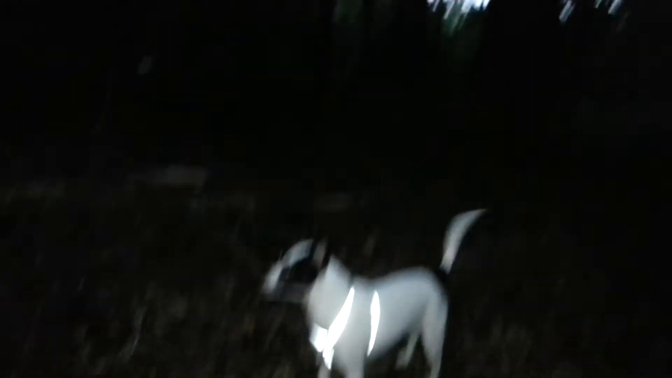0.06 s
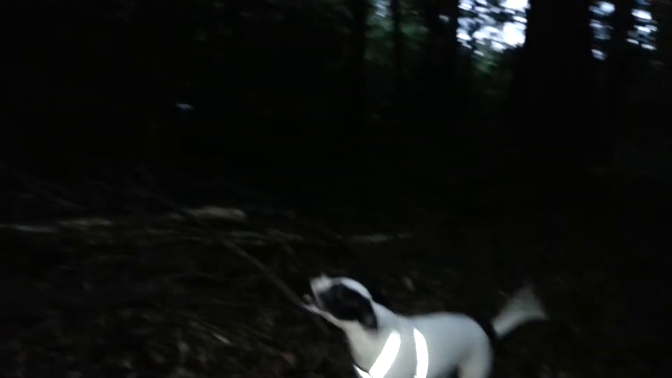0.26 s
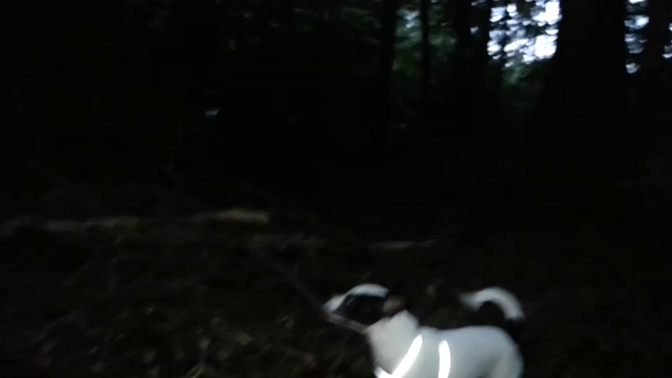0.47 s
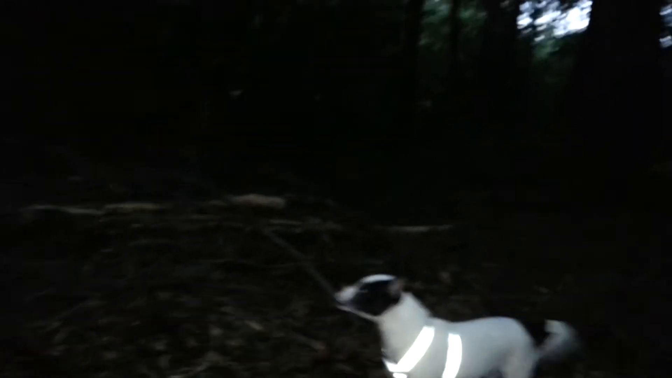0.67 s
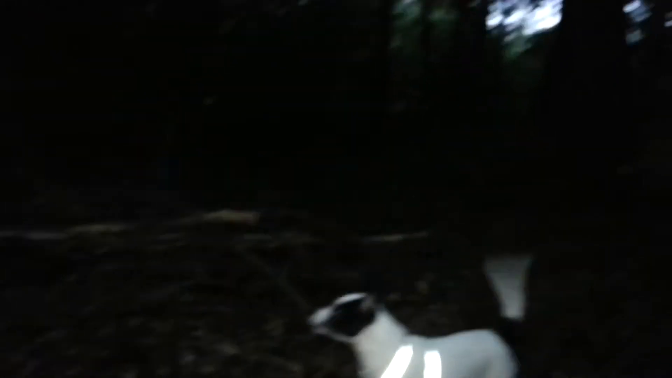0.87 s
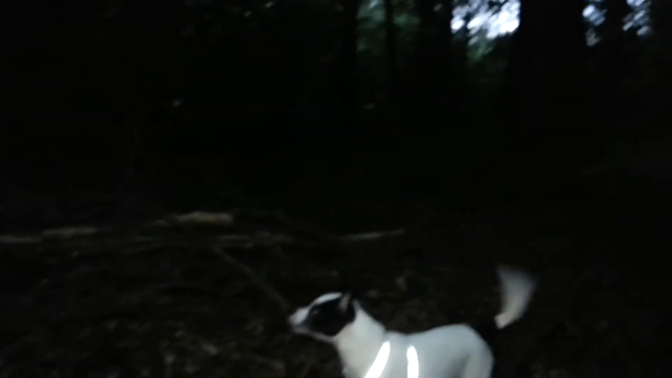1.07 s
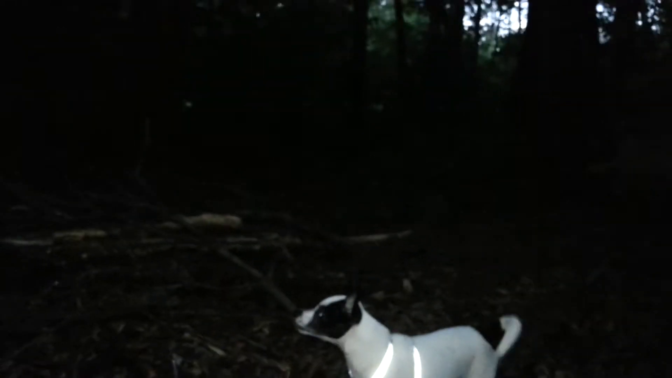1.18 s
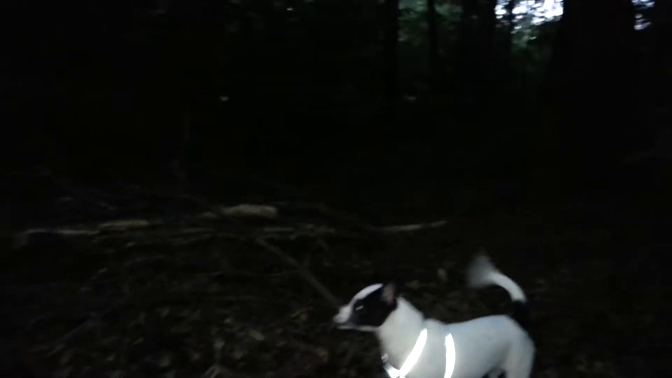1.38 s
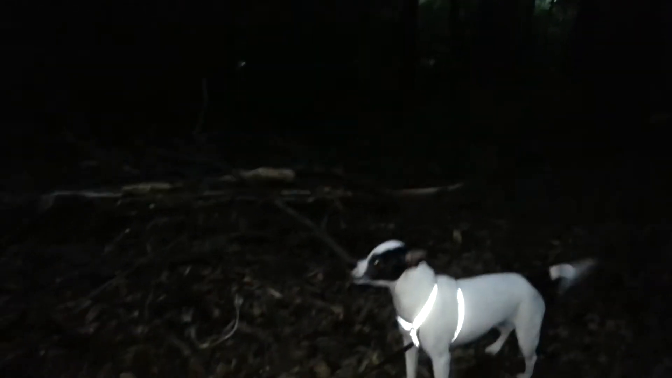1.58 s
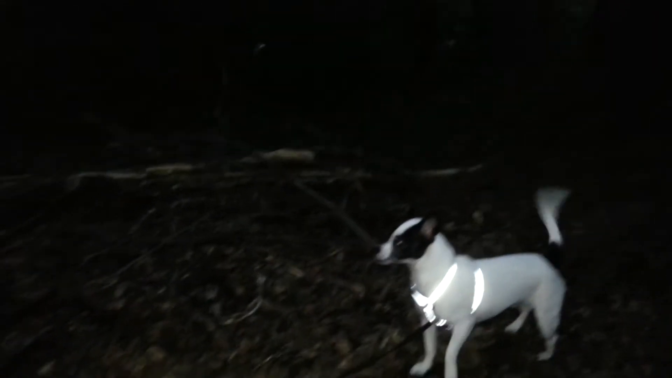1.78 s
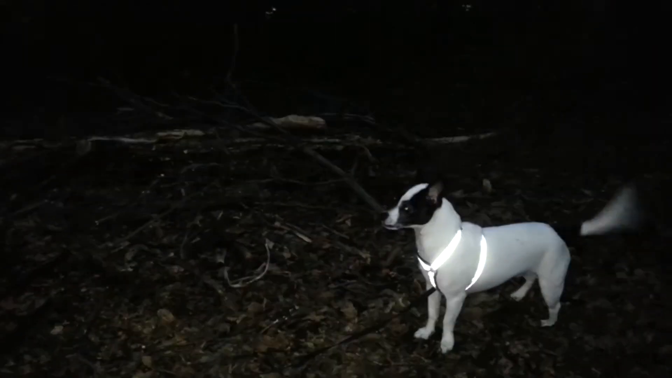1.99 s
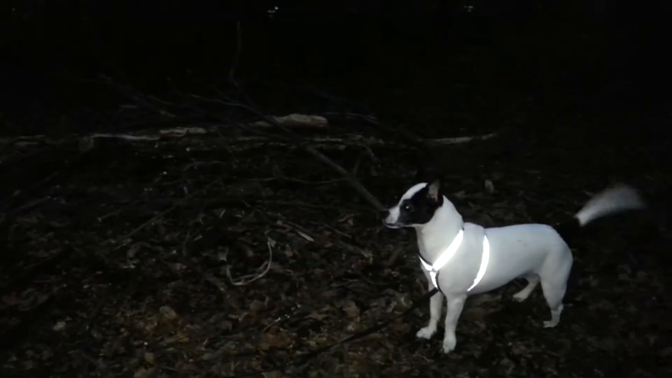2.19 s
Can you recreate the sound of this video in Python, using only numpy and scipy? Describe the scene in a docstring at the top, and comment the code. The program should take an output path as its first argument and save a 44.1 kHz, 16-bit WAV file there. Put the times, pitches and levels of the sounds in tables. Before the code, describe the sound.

A small dog growls, gives one loud sharp bark, then a soft woof and more growling

```python
"""Small dog in the night woods

Close to the microphone a small dog growls in stuttering pulses, gives one loud bark that overloads the input,
then a softer woof and more growling: pulses and puffs of turbulence ring resonances of throat, muzzle and chest.
The trees answer with a long echo of coloured, dying noise; twigs tick as short crackles of noise.
Air and insects are bands of noise; far off another dog yelps, a few wavering harmonics."""
import sys
import numpy as np
from scipy import signal
from scipy.fft import rfft, irfft, next_fast_len
from scipy.io import wavfile
from scipy.ndimage import map_coordinates

SR = 44100
rng = np.random.default_rng(int(sys.argv[2]) if len(sys.argv) > 2 else 0)


def log_audio(samples):
    """Write samples as a 16-bit WAV file to the path given in sys.argv[1]."""
    # one column per channel
    frames = np.atleast_2d(samples).T
    # limit to full scale, then quantise
    limited = np.clip(frames, -1, 1)
    pcm = np.round(limited * 32767).astype(np.int16)
    wavfile.write(sys.argv[1], SR, pcm)


N = 97020  # samples, 2.2 s


def amp(db):
    """Amplitude factor of a level in dB."""
    return 10 ** (np.asarray(db) / 20)


def unit(x):
    """x scaled to an RMS of one."""
    return x / np.sqrt(np.mean(x ** 2) + 1e-20)


def along(points, hz):
    """Read a curve of (f/Hz, value) points on a log frequency axis."""
    f, v = np.transpose(points)
    return np.interp(np.log(hz + 1), np.log(f + 1), v)


def wobble(rate):
    """A smooth random curve, rate knots a second."""
    knots = rng.standard_normal(int(N * rate / SR) + 4)
    return map_coordinates(knots, [np.arange(N) * rate / SR])


def filtered(x, response):
    """x times a complex response of frequency."""
    m = next_fast_len(N + SR // 2)
    spectrum = rfft(x, m) * response(np.fft.rfftfreq(m, 1 / SR))
    return irfft(spectrum, m)[..., :N]


def high_pass(x, hz):
    """Steep causal cut below hz: four one-pole stages."""
    return filtered(x, lambda f: (1j * f / (hz + 1j * f)) ** 4)


def rings(when, sizes, modes, onset_s):
    """Each push rings damped resonances (f/Hz, width/Hz, level/dB), neighbours in opposite sign."""
    at = np.floor(when * SR)[:, None] + np.arange(700)
    t = np.maximum(at / SR - when[:, None], 0)
    wave = 0
    for k, (hz, width, db) in enumerate(modes):
        tone = np.sin(2 * np.pi * np.reshape(hz, (-1, 1)) * t)
        wave = wave + (-1) ** k * amp(db) * tone * np.exp(-np.pi * width * t)
    wave = wave * (1 - np.exp(-t / onset_s)) ** 2 * sizes[:, None]
    # samples outside the scene pile up at its two ends; the last one is dropped
    return np.bincount(at.clip(0, N).astype(int).ravel(), wave.ravel(), N + 1)[:N]


# colour of the still air: f/Hz, relative level/dB
AIR_COLOUR = [(25, -32.5), (60, -22.5), (120, -12), (300, -8.5), (900, -10), (1800, -20), (2700, -20.5),
              (3700, -19), (6500, -25), (11000, -24), (14500, -37)]
# bands of far insects: centre f/Hz, width/Hz (between the 1/e points), level/dB
INSECT_BANDS = [(4788, 720, -58.5), (2513, 1000, -61.5)]
AIR_DB = -55.5


def night():
    """Still air as coloured noise partly shared by both channels, and two gently wavering insect bands."""
    a, b = rng.standard_normal((2, N))
    sides = np.array([a + 0.56 * b, a - 0.45 * b])
    air = unit(filtered(sides, lambda hz: amp(along(AIR_COLOUR, hz))))
    song = 0
    for centre, width, db in INSECT_BANDS:
        level = amp(db + 0.83 * wobble(28))
        noise = rng.standard_normal((2, N))
        song = song + level * unit(filtered(noise, lambda hz: np.exp(-(2 * (hz - centre) / width) ** 2)))
    return amp(AIR_DB + 0.39 * wobble(3)) * air + song


# runs of the growl: start t/s, gap between pulses/ms, pulses, relative level/dB
GROWL_RUNS = [(-.001, 9.1, 2, -37), (0.0254, 7.1, 3, -28.5), (.071, 7.8, 2, -31), (0.108, 6.2, 2, -32),
              (1.711, 10.4, 4, -44.5), (1.755, 7.5, 3, -45), (1.7922, 13, 3, -48), (1.8326, 5.7, 5, -31),
              (1.904, 12.2, 3, -38.5), (1.9476, 11.6, 3, -32), (1.9965, 10.9, 2, -31.5),
              (2.0196, 12, 3, -43.5), (2.075, 9, 1, -31.5), (2.106, 6.6, 7, -33.5), (2.1653, 14, 4, -29)]
# resonances behind the shut muzzle: f/Hz, width/Hz, level/dB
MUZZLE_MODES = [(240, 200, -5), (450, 230, -2), (890, 230, 0)]


def growl():
    """Slow pulses in short runs, a little uneven in time and level, ring the shut muzzle."""
    pulses = np.array([(s + k * gap / 1000, db)
                       for s, gap, count, db in GROWL_RUNS for k in range(round(count))])
    chance = rng.standard_normal((80, 2))[:len(pulses)]
    when = pulses[:, 0] + .0003 * chance[:, 0]
    sizes = amp(pulses[:, 1] + 6 + 1.3 * chance[:, 1])
    return -rings(when, sizes, MUZZLE_MODES, onset_s=.0009)


# ticks under the paws: t/s, level of the part above 6 kHz (peak)/dB, left over right/dB, peak level of the part
# from 2 to 6 kHz relative to the upper part, less 6 dB/dB
TWIG_TICKS = [(0.0502, -34, -6, -16.5), (0.5266, -26, -7, -19.5), (0.5583, -52, -10.5, 4.5),
              (0.6168, -42.5, -4, -2), (0.7705, -35, -7, -20), (0.802, -36, -2.0, -27),
              (1.064, -37.5, 0, -33), (1.5231, -32, 3.5, -16), (1.6397, -34, -1.0, -18.5),
              (1.7717, -17.5, -7.5, -11), (1.8146, -29.5, -13.5, -8), (1.8231, -26.5, 2, -14.5),
              (1.928, -27, 4.5, -12), (2.1004, -32, -10, -11.5), (2.1325, -32, -5.5, -13)]
TWIG_T60 = .008  # s


def twigs():
    """Dry ticks: spiky noise in two bands, dying within milliseconds."""
    out, t = np.zeros((2, N + 900)), np.arange(900) / SR
    above = signal.butter(2, 6000, "high", fs=SR, output="sos")
    below = signal.butter(2, [2000, 6000], "band", fs=SR, output="sos")
    for s, db, pan, low_db in TWIG_TICKS:
        # cubing the noise makes it spiky
        crackle = rng.standard_normal((2, len(t))) ** 3 * amp(-60 * t / TWIG_T60)
        high = signal.sosfilt(above, crackle[0])
        low = signal.sosfilt(below, crackle[1])
        tick = high / abs(high).max() + amp(low_db + 6) * low / abs(low).max()
        start = round(s * SR)
        out[:, start:start + len(t)] += amp(db + np.array([[pan / 2], [-pan / 2]])) * tick
    return out[:, :N]


# the two calls: t/s, pitch f/Hz, relative level/dB, mouth (0 nearly shut, 1 wide), second resonance f/Hz,
# lift of the upper resonances/dB, relative chest level/dB, breath hiss level/dB
BARK_PATH = [(.1975, 275.7, -12, 0.4, 1430, -4.5, -47.5, -59),
             (.207, 310.2, -2.5, 0.27, 1520, 1, -36.5, -46.5),
             (.222, 339.2, 3, 0.5, 1624, -2.5, -29.5, -36.5), (.241, 375.6, 1, 0.76, 1650, 5, -27, -32.5),
             (.246, 477.1, 1, 1.1, 1573, 7, -38.5, -40), (.268, 483.6, -0.5, 1.01, 1524, 2, -40.5, -29),
             (.29, 443.4, -1, 0.96, 1467, 5.5, -39.5, -37), (.305, 452.5, -1, 0.8, 1566, -4.5, -40, -38),
             (.32, 440.7, -6, 0.78, 1570, 8, -39.5, -48), (.34, 436.3, -8.5, 1, 1480, 3, -43, -50),
             (.357, 402.7, -6, 0.6, 1480, -13, -33.5, -55), (.365, 327.8, -19.5, 0.98, 1480, -9, -31, -59),
             (.385, 260.5, -17.5, 0.66, 1480, -5.5, -37, -50), (.42, 195.5, -35, 1, 1480, -5.5, -35, -55),
             (.435, 176.5, -37.5, .8, 1480, -5, -60, -74.5)]
WOOF_PATH = [(1.553, 215.4, -20.5, 0.13, 1280, -24.5, -58.5, -59),
             (1.56, 211.1, -13.5, 0.12, 1280, -8.5, -28, -54),
             (1.57, 207.2, -16.5, 0.065, 1290, -5.5, -35.5, -55), (1.584, 216, -13, .1, 1263, 2, -35, -51),
             (1.596, 222.8, -12, 0.23, 1368, -0.5, -15.5, -49),
             (1.601, 237.7, -9.5, 0.39, 1424, 6, -33, -54.5), (1.608, 219.6, -23, 0.46, 1403, -5, -42, -39),
             (1.62, 141, -15, 0.68, 1416, -5, -26.5, -47.5),
             (1.645, 143.2, -22, 0.87, 1520, -8, -30, -46.5),
             (1.674, 117.8, -52.5, 0.77, 1452, 6, -39, -52.5),
             (1.71, 107, -47.5, 0.79, 1274, 2, -34, -55.5)]
# the four throat resonances, lowest first: width/Hz, level/dB
THROAT_MODES = [(135, 4), (154, -2.5), (132, -12.5), (400, -38.5)]
# roughness of the voice through both calls: t/s, roughness (0-1)
ROUGHNESS = [(.2, .35), (.213, .06), (.24, .07), (.246, .45), (.265, .3), (.285, .25), (.3, .12),
             (.315, .5), (.345, .4), (.365, .1), (1.55, .3), (1.575, .45), (1.595, .3), (1.62, .45),
             (1.7, .4)]
# colour of the breath: f/Hz, relative level/dB
BREATH_COLOUR = [(1500, -26.5), (4500, -14), (9000, -17), (13000, -27.5)]
JITTER, SHIMMER_DB = .12, 7  # random spread at full roughness: of a cycle; in dB
TURBULENCE = 2500  # puffs a second
FIRST, THIRD = (600, 910), (1791, 2320)  # Hz with the mouth nearly shut, Hz with it wide
FOURTH_HZ = 4110
CHEST_HZ, CHEST_WIDTH_HZ = 215, 120  # the chest rings at this or at the pitch, whichever is higher
VOICE_LOW_HZ = 379


def call(rows):
    """Vocal-fold pulses and turbulent puffs ring the throat; the pulses also ring the chest; breath hisses."""
    s, pitch, level, mouth, second_hz, upper_db, chest_db, hiss_db = np.transpose(rows)
    t = np.arange(N) / SR
    span = t[(t > s[0]) & (t < s[-1])]
    cycles = np.cumsum(np.interp(span, s, pitch)) / SR
    chance = rng.standard_normal((2000, 3))

    # one pulse a cycle; roughness moves energy from pulses to puffs
    beats = np.interp(np.arange(int(cycles[-1])), cycles, span)
    rough, rate = np.interp(beats, *np.transpose(ROUGHNESS)), np.interp(beats, s, pitch)
    sizes = np.sqrt((1 - rough) / rate) * amp(SHIMMER_DB * rough * chance[:len(rough), 0])
    beats = beats + JITTER * rough * chance[:len(rough), 1] / rate
    puffs = np.arange(s[0], s[-1], 1 / TURBULENCE)
    puff_rough = np.interp(puffs, *np.transpose(ROUGHNESS))
    puff_sizes = np.sqrt(puff_rough / TURBULENCE) * chance[:len(puffs), 2]

    # an opening mouth raises the first and third resonances
    when = np.r_[beats, puffs]
    wide = np.interp(when, s, mouth)
    lift_db = np.interp(when, s, upper_db)[:, None]
    centres = [FIRST[0] + wide * np.ptp(FIRST), np.interp(when, s, second_hz),
               THIRD[0] + wide * np.ptp(THIRD), FOURTH_HZ]
    modes = [(hz, width, db + (k > 0) * lift_db)
             for k, (hz, (width, db)) in enumerate(zip(centres, THROAT_MODES))]
    pushes = amp(31.5 + np.interp(when, s, level)) * np.r_[sizes, puff_sizes]
    voice = rings(when, pushes, modes, onset_s=0.00053)

    chest_pushes = amp(30 + np.interp(beats, s, chest_db)) * sizes
    chest_modes = [(np.maximum(rate, CHEST_HZ), CHEST_WIDTH_HZ, 0)]
    chest = rings(beats, chest_pushes, chest_modes, onset_s=0.00084)

    breath = unit(filtered(rng.standard_normal(N), lambda hz: amp(along(BREATH_COLOUR, hz))))
    breath = breath * amp(np.interp(t, s, hiss_db, -120, -120) + 3.5 * wobble(250))
    return high_pass(voice, VOICE_LOW_HZ) + high_pass(chest, 80) + breath


# how long the trees ring: f/Hz, time to fall 60 dB t/s
WOODS_T60 = [(200, 1.8), (900, 1.18), (2400, 0.97), (5000, 1.7), (12000, 1)]
# colour of the echo: f/Hz, relative level/dB
ECHO_COLOUR = [(300, -11.5), (650, -4), (900, -8), (1150, 11.5), (1500, -3.5), (1900, 3), (2400, 4),
               (6000, 5)]
WOODS_LEFT_DB = 2.5  # left over right


def woods(x):
    """Echoes off the trunks build up, then each frequency dies at its own speed."""
    hz, t, z = signal.stft(rng.standard_normal((2, 2 * SR)), SR, nperseg=256)
    fall_db = along(ECHO_COLOUR, hz)[:, None] - 60 * t / along(WOODS_T60, hz)[:, None]
    build_up = 1 - np.exp(-t / 0.04)
    far = signal.istft(z * amp(fall_db) * build_up, SR, nperseg=256)[1]
    far = far / np.linalg.norm(far[0]) * amp([[WOODS_LEFT_DB / 2], [-WOODS_LEFT_DB / 2]])
    return signal.fftconvolve(x[None], far, axes=1)[:, :N]


# path of the far yelp: t/s, pitch f/Hz, relative level/dB
YELP_PATH = [(2.02, 584, -76.5), (2.05, 592, -61.5), (2.075, 600, -57), (2.088, 601.5, -67),
             (2.116, 620, -51.5), (2.136, 608.5, -54.5), (2.152, 600.5, -63), (2.184, 592.6, -59),
             (2.2, 595, -75)]
# its harmonics: multiple of the pitch, relative level/dB
YELP_TONES = [(2, -1), (3, 3)]


def far_dog():
    """A thin yelp far off: harmonics that waver in pitch and level."""
    s, pitch, level = np.transpose(YELP_PATH)
    t = np.arange(N) / SR
    wavering = np.interp(t, s, pitch) * (1 + .025 * wobble(110))
    phase = 2 * np.pi * np.cumsum(wavering) / SR
    tones = sum(amp(db + 5 * wobble(140)) * np.sin(k * phase) for k, db in YELP_TONES)
    return amp(np.interp(t, s, level, -120)) * tones


# the near dog between the two channels: f/Hz, left over right/dB
DOG_LEFT_DB = [(500, -1.5), (900, 1), (1700, 6.5), (5000, 1), (12000, 2)]
# its phase between the channels: f/Hz, lead of the left/rad
DOG_LEFT_LEAD = [(0, 0), (520, -1.8), (1290, 1), (1720, -0.67), (2500, 1), (2760, -1.5)]
GROUND_S, GROUND_DB = 0.001558, -17  # delay and level of the bounce
BARK_ECHO_DB, SOFT_ECHO_DB = -15.5, -23.5  # the bark carries into the trees, the muffled calls less


def scene():
    """The dog, once direct and once off the ground, in the night woods."""
    bark = call(BARK_PATH)
    soft = call(WOOF_PATH) + high_pass(growl(), 70)

    def placed(hz):
        """Left and right response: level and phase split evenly, plus the bounce."""
        left = amp(along(DOG_LEFT_DB, hz) / 2) * np.exp(.5j * along(DOG_LEFT_LEAD, hz))
        bounce = amp(GROUND_DB) * np.exp(-2j * np.pi * hz * GROUND_S)
        return np.array([left, 1 / left]) * (1 + bounce)

    direct = filtered(bark + soft, placed)
    echo = woods(amp(BARK_ECHO_DB) * bark + amp(SOFT_ECHO_DB) * soft)
    return direct + echo + far_dog() + twigs() + night()


CEILING, BIAS = 1.0, 0.093  # full scale; offset of the input
KNEE = 8  # higher clips harder
TOP_HZ = 14800


def record(dry):
    """The microphone input sits a little off centre and clips; little passes above the band limit."""
    x = dry + BIAS
    x = x / (1 + abs(x / CEILING) ** KNEE) ** (1 / KNEE) - BIAS

    def band(hz):
        """18 dB down above TOP_HZ, nothing from 20 kHz, a gentle cut below 20 Hz."""
        top = np.where(hz < TOP_HZ, 1, amp(-18)) * (hz < 20000)
        return top * (1j * hz / (20 + 1j * hz))

    return np.clip(filtered(x, band), -1, 1)


dry = scene()
out = record(dry)
log_audio(out)
```